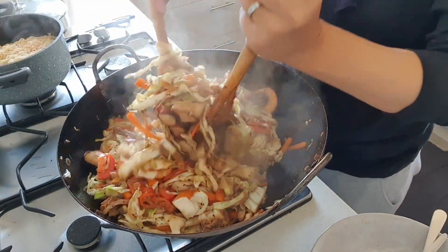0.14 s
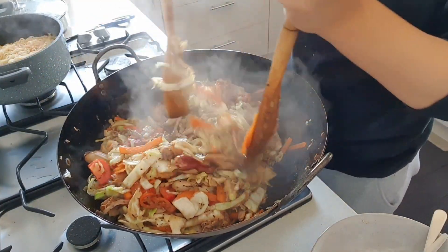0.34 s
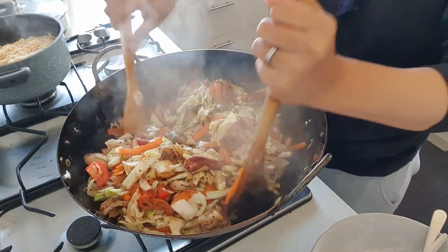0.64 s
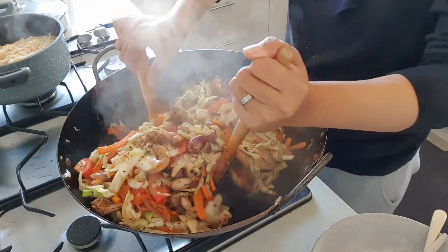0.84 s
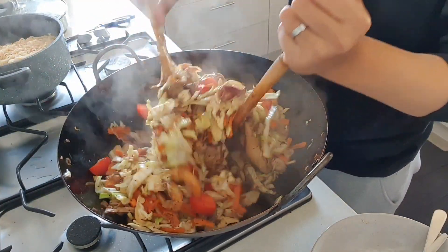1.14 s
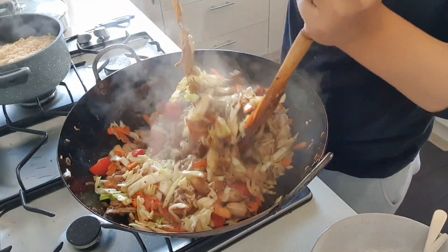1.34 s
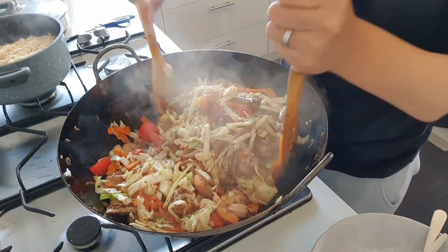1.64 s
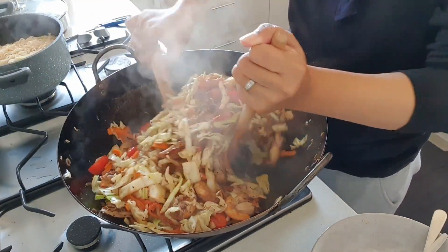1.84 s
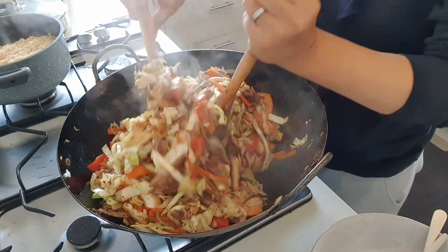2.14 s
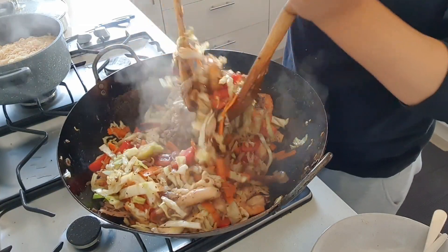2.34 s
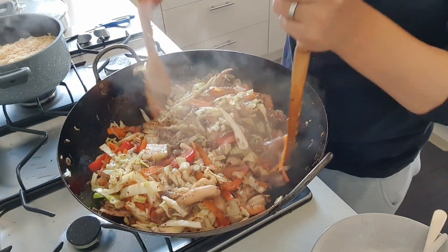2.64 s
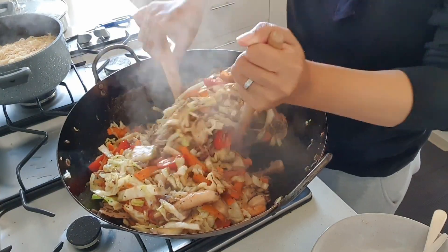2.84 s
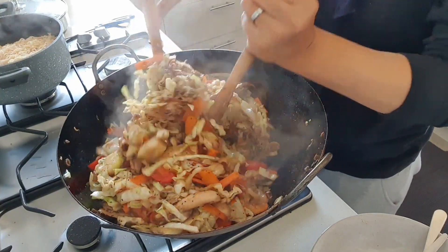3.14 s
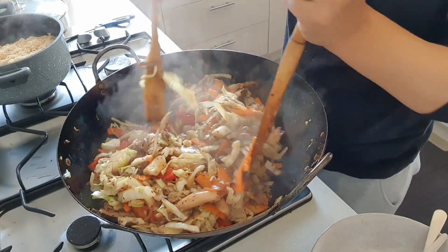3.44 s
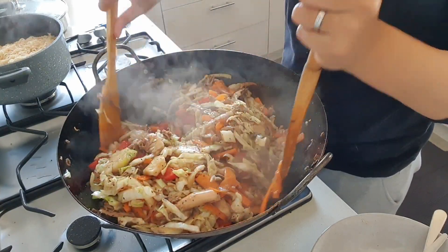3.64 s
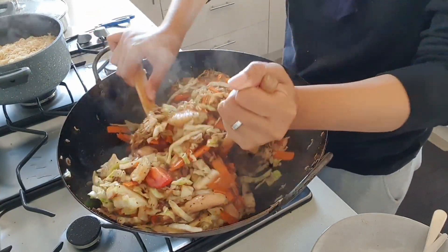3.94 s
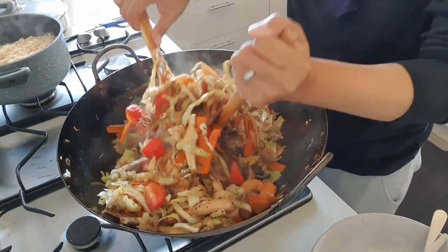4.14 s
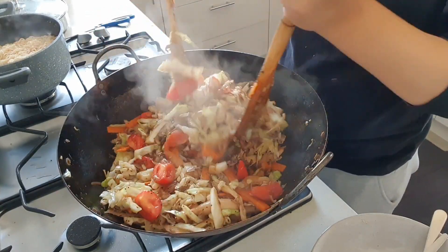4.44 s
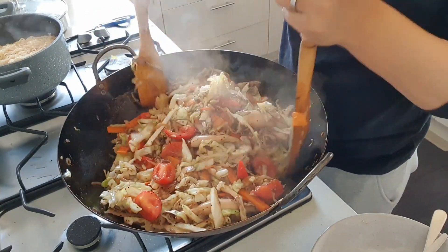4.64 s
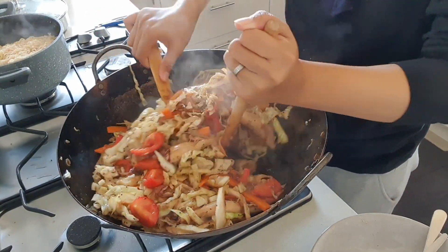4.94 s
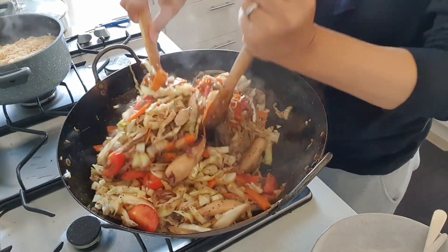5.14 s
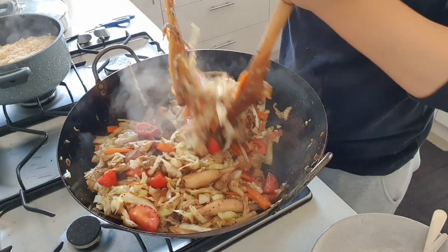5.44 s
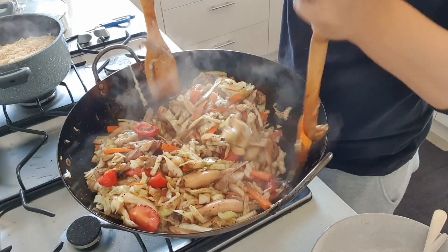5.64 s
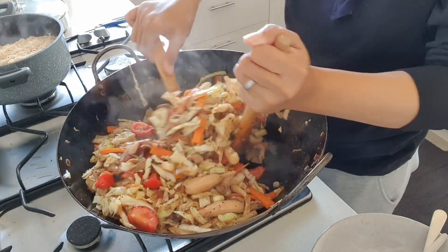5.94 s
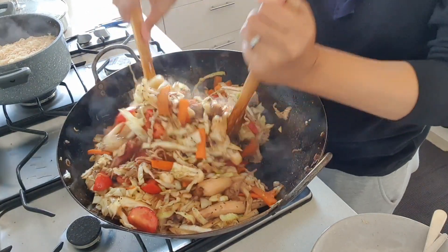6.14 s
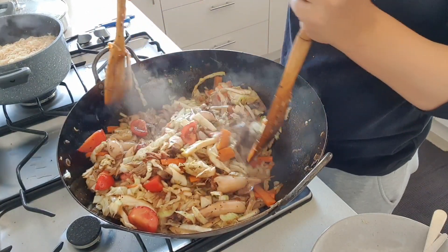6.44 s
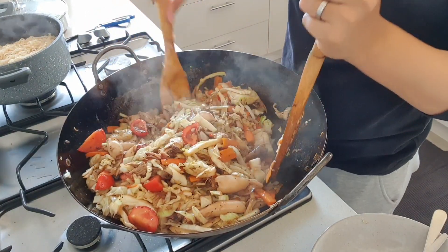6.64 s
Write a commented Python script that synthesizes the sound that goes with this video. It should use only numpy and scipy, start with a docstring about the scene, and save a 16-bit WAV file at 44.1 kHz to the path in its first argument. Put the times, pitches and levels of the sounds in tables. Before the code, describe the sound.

A phone close to the stove in a small, hard kitchen picks up a steady low fan hum with soft airy rush and hob rumble. From 0 s wet vegetable shreds rustle, swish and drop with tiny ticks over faint fine sizzle; light taps come at about 0.6, 0.7 and 1.2 s. At 1.67 s a sharp wooden clack on steel starts a quick run of smaller knocks until 2 s. At 2.4 s the wok skids on its iron support: a loud, gritty, clattering metallic scrape with a low thump, trailing into weaker scrapes until about 3.1 s. The food quietens around 3.5 s, with soft taps near 3.9 and 4.1 s. A hard dry clack lands at 4.68 s with rapid followers, the hardest at 5.7 s, then scattered light knocks and a moderate one at 6.55 s. Soft swishes and hum finish by 6.8 s.

```python
"""A soft wet rush and rustle of vegetables over a humming extractor fan, then wooden spatulas knock on a steel wok.
Knocks are noise pulses ringing short bowl modes; skids are grainy stick-slip noise, bare and through
the modes of the iron support. Food is swept noise, tiny ticks, rustle and sizzle; behind it lie fan tones,
rushing air and the rumble of the gas hob. A phone hears it close by, through two ports, in a small hard kitchen."""
import sys
import numpy as np
from scipy import signal
from scipy.fft import rfft, irfft
from scipy.io import wavfile
from scipy.ndimage import uniform_filter1d

SR = 44100
rng = np.random.default_rng(int(sys.argv[2]) if len(sys.argv) > 2 else 0)


def unload_audio(sound):
    """Save the sound as a 16-bit wav file, at the path given as the first command line argument."""
    columns = np.transpose(np.atleast_2d(sound))
    # keep every value between -1 and 1, then stretch to whole-number steps
    steps = np.round(np.clip(columns, -1, 1) * 32767)
    wavfile.write(sys.argv[1], SR, steps.astype(np.int16))


N = 299880
T = np.arange(N) / SR


def undb(db):
    """Decibels to gain."""
    return 10 ** (np.asarray(db) / 20)


def unit(x):
    """Scale to rms 1."""
    return x / np.sqrt(np.mean(x ** 2))


def fade(t, t60_s):
    """Exponential decay that loses 60 dB in t60_s."""
    return 1000. ** (-t / t60_s)


def colour(x, points):
    """Shape a spectrum by (Hz, dB) points, cut by 60 dB outside them; rms 1."""
    hz, db = np.transpose(points)
    log_f = np.log(np.fft.rfftfreq(x.shape[-1], 1 / SR) + 1)
    gain = undb(np.interp(log_f, np.log(hz), db, -60, -60))
    return unit(irfft(rfft(x) * gain, x.shape[-1]))


def band(x, lo_hz, hi_hz):
    """Fourth-order band-pass."""
    return signal.sosfilt(signal.butter(2, [lo_hz, hi_hz], "band", fs=SR, output="sos"), x)


def ring(x, hz, t60_s):
    """One decaying mode; a unit impulse rings with amplitude about 1."""
    r, w = fade(1 / SR, t60_s), 2 * np.pi * hz / SR
    return signal.lfilter([0, np.sin(w)], [1, -2 * r * np.cos(w), r * r], x)


def walk(rate_hz):
    """Random levels held 1 / rate_hz and slewed; spread near 1."""
    k = int(SR / rate_hz)
    steps = np.repeat(rng.standard_normal(N // k + 1), k)
    return 1.41 * uniform_filter1d(uniform_filter1d(steps, k), k)[:N]


def grains(rate_hz, spread_db, tail_s):
    """Envelope of dense random contacts, a few much stronger, each with a short tail; rms 1."""
    when, size = rng.random((2, N))
    hits = (when < rate_hz / SR) * undb(-spread_db * np.log(size + 0.0045))
    return unit(signal.lfilter([1], [1, -np.exp(-1 / (tail_s * SR))], hits))


def curve(table):
    """Columns of a table joined by straight lines in time."""
    s, *columns = np.transpose(table)
    return [np.interp(T, s, c) for c in columns]


ALIKE_HZ = 650  # around here the two ports pass from similar to unrelated sound


def ports(n):
    """Diffuse noise at the two ports: nearly the same in the bass, unrelated in the treble."""
    mid, side = rfft(rng.standard_normal((2, n)))
    f = np.fft.rfftfreq(n, 1 / SR) + 1
    apart = np.maximum(.1, 1 / np.sqrt(1 + (ALIKE_HZ / f) ** 4))
    return irfft(np.array([mid + apart * side, mid - apart * side]) / np.sqrt(1 + apart ** 2), n)


PORT_LAG_S = .0005  # most by which one port hears a contact before the other


def rough(n, apart=0.87):
    """Contact noise from one spot: it meets the ports at different times, partly scattered on the way."""
    x, other = rng.standard_normal((2, n))
    lag = int(PORT_LAG_S * SR * rng.uniform(-1, 1))
    return np.array([x, (np.roll(x, lag) + apart * other) / np.sqrt(1 + apart ** 2)])


def rubs(table, chatter, rise_s):
    """For each row its start sample and a burst of grainy noise that rises, holds and fades in its own colour."""
    t = T[:3 * SR // 4]
    f = np.fft.rfftfreq(len(t), 1 / SR) + 1
    for s, db, hz, octaves, hold_s, t60_s in table:
        i = int(s * SR)
        tint = 1 / (1 + (np.log2(f / hz) / octaves) ** 2) ** 1.095
        grainy = rough(len(t)) * np.roll(chatter, -i)[:len(t)]
        rub = unit(irfft(rfft(grainy) * tint, len(t)))
        shape = np.minimum(t / rise_s, 1) * fade(np.maximum(t - hold_s, 0), t60_s)
        yield i, undb(db) * rub * shape


# Spatula blows on the bowl. Each row: start in seconds, level in dB of the blow (the clack and most layers
# follow it, the broad crack stays equally loud), pitch of the clack in Hz, low bowl ring in dB relative
# to the blow before the layer trims.
BLOWS = [(0.55, -49.5, 776, 12), (0.741, -39.5, 2710, -10.5), (1.215, -38, 2020, -30), (1.62, -43, 760, 5),
         (1.668, -22, 1510, -31), (1.67, -17.5, 4120, -26), (1.75, -35, 1620, -10), (1.79, -28, 3110, -25),
         (1.821, -27, 1380, -23), (1.883, -26.5, 975, -44), (1.994, -31, 1360, -39),
         (3.881, -34.5, 1120, -33), (4.134, -39, 1310, -35), (4.662, -38.5, 3920, -14),
         (4.677, -15.5, 4140, -19.5), (4.715, -21.5, 2190, -13.5), (4.874, -33.5, 1930, -20),
         (4.921, -44, 1380, -20), (5.184, -41, 2390, -32), (5.235, -40, 1380, -27), (5.45, -40, 5000, -30),
         (5.524, -36, 3660, -30), (5.536, -36, 2720, -37), (5.651, -32.5, 3250, -37),
         (5.695, -13.5, 4140, -28.5), (5.743, -26.5, 2390, -16.5), (5.801, -36, 1370, -10),
         (6.047, -35.5, 1690, -36), (6.088, -42, 4020, -25), (6.219, -34.5, 1140, -35),
         (6.33, -41.5, 2140, -26), (6.554, -26.5, 4280, -11)]
# Modes of the loaded bowl, the first two its low note. Each row: pitch in Hz, relative level in dB
# before random scatter, decay t60 in seconds.
BOWL_MODES = [(530, 0, .22), (730, -5, .12), (1420, -8, .04), (2100, -6, .04), (2370, -6, .05),
              (3820, -6, .04), (4300, -8, .06), (4600, -8, .05)]
SOFT_DB = -35  # a gentle knock
CRACK_DB, CRACK_SINKS = -19, 1  # broad crack under a gentle knock; dB it falls behind per dB of harder blow
WOOD_DB, WOOD_SINKS = -7, 0.1  # woody body, likewise


def knocks():
    """Wood lands on steel and rebounds once, more on hard blows; food damps the bowl to a dry clack and short modes."""
    out, t = np.zeros((2, N + SR)), T[:SR // 2]
    lead = T[:SR // 50]
    push = (t / .0007) * np.exp(-t / 0.00059)
    second_push = np.roll(push, int(0.00513 * SR))
    for s, db, hz, low_db in BLOWS:
        harder_db = db - SOFT_DB
        crack_db = CRACK_DB - CRACK_SINKS * harder_db
        wood_db = WOOD_DB - WOOD_SINKS * harder_db
        rebound = min(undb(0.71 * (db + 11)), 1)
        contact = rough(len(t)) * (push + rebound * second_push)

        clack = ring(contact, hz, 0.018)
        tail = band(rough(len(t)), hz / 0.89, hz * 1.57) * t / (t + .002) * fade(t, 0.12)
        thud = band(rough(len(t)), 310, 1090) * t / (t + 0.0033) * fade(t, 0.25)
        wood_fade = fade(t, 0.013) + 0.39 * fade(t, 0.082)
        wood = band(rough(len(t)), 1100, 2440) * t / (t + 0.00052) * wood_fade
        crack = band(contact, 1000, 10000)

        # each blow wakes the modes differently
        scatter_db = 0.83 * rng.standard_normal(len(BOWL_MODES))
        modes = [undb(g + e) * ring(contact, f, t60_s)
                 for (f, g, t60_s), e in zip(BOWL_MODES, scatter_db)]
        low_note = sum(modes[:2])
        # upper modes are stronger the closer they lie to the clack: 6 dB lost per octave away
        near_modes = sum(undb(-6 * abs(np.log2(m[0] / hz))) * x
                         for m, x in zip(BOWL_MODES[2:], modes[2:]))

        # each layer is set by its peak, in dB relative to the blow
        layers = [(clack, -1.5), (tail, -15), (near_modes, -11), (low_note, low_db + 3.5),
                  (thud, low_db - 0.5), (wood, wood_db), (crack, crack_db)]
        i = int(s * SR)
        out[:, i:i + len(t)] += sum(undb(db + g) * x / np.abs(x).max() for x, g in layers)
        # the blade grazes the steel just before it lands
        graze = unit(band(rough(len(lead)), hz / 1.15, hz * 1.67)) * np.exp(-lead[::-1] / 0.0034)
        out[:, i - len(lead):i] += undb(db - 11.5) * graze
    return out[:, :N]


# Steel slipping on iron; the two low rows (2.43 s and 3.04 s) are the hob groaning. Each row: start in seconds,
# # level in dB rms before its envelope and the mix trims, centre of its colour in Hz, spread in octaves, fade
# t60 in seconds.
SLIPS = [(1.277, -42.5, 2090, 0.19, 0.42), (2.264, -38.5, 2150, 0.24, 0.21),
         (2.388, -17, 6200, 1.3, 0.36), (2.395, -32.5, 1120, 0.36, 0.35),
         (2.402, -16, 5160, 0.58, 0.11), (2.409, -20, 2020, 0.52, 0.11), (2.43, -35, 430, 0.51, 1),
         (2.472, -19.5, 3260, 0.66, 0.11), (2.497, -29, 2070, 0.57, 0.38),
         (2.51, -33, 5560, 0.31, 0.28), (2.58, -37, 4900, 1.1, 0.57),
         (2.644, -31, 3260, 1.77, 0.14), (2.691, -44.5, 1900, 1.2, 0.66),
         (2.886, -28, 4170, 1.08, 0.19), (2.9, -37, 1060, 0.13, 0.38),
         (3.016, -38.5, 3730, 1.5, 0.27), (3.04, -42, 350, 0.29, 0.43),
         (3.057, -42.5, 2740, 1.35, 0.17), (4.825, -46, 1130, 0.28, 0.12),
         (6.667, -50, 2020, 0.12, 0.19)]
# Modes of the cast-iron support. Each row: pitch in Hz before detuning, relative level in dB before scatter,
# decay t60 in seconds before the wok's damping.
SUPPORT_MODES = [(290, -8, .25), (360, -8, .25), (447, -9, .2), (610, -12, .15), (759, -14, .2),
                 (1034, 0, .2), (1290, -7, .1), (1955, 0, .12), (2090, -4, .12), (2213, -4, .1),
                 (2854, -3, .15), (3160, -7, .1), (3367, 0, .12), (3505, -6, .15), (3800, -6, .08),
                 (4047, -1, .12), (4705, 2, .07), (5066, -5, .08), (5225, -5, .08), (5465, -3, .08),
                 (5778, -9, .15), (6750, -7, .12), (7374, -6, .1), (7495, -6, .1)]
SLIP_HOLD_S = 0.017
DAMPING = 1.7  # the loaded wok shortens the ring of its support by this factor


def skids():
    """Stick-slip chatter, heard bare and through the modes of the support; each slip wakes them differently."""
    out = np.zeros((2, N + SR))
    slips = [(s, db, hz, octaves, SLIP_HOLD_S, t60_s) for s, db, hz, octaves, t60_s in SLIPS]
    chatter = .5 + grains(1200, 3.2, 0.0015)
    for i, rub in rubs(slips, chatter, rise_s=0.003):
        scatter_db = 2 * rng.standard_normal(len(SUPPORT_MODES))
        detune = .003 * rng.standard_normal(len(SUPPORT_MODES))
        rung = sum(undb(g + e) * ring(rub, hz * (1 + u), t60_s / DAMPING)
                   for (hz, g, t60_s), e, u in zip(SUPPORT_MODES, scatter_db, detune))
        clatter = np.std(rub) * unit(rung)
        out[:, i:i + rub.shape[1]] += undb(-2.0) * clatter + undb(-2.5) * rub
    return out[:, :N]


# Food tipping over or swept along the steel. Each row: start in seconds, level in dB rms before its envelope,
# centre of its colour in Hz, hold in seconds.
FOOD_SWEEPS = [(.04, -39, 7140, 0.008), (0.371, -52, 3300, 0.03), (.505, -49, 2300, 0.066),
               (0.654, -52.5, 3500, 0.076), (0.726, -47, 2150, 0.11), (1.038, -50.5, 2400, 0.055),
               (1.268, -47, 3850, 0.048), (1.364, -46, 3300, 0.011), (1.76, -46.5, 2960, 0.047),
               (3.781, -56, 1880, 0.46), (4.79, -47.5, 3250, 0.039), (5.398, -59, 4520, 0.066),
               (5.501, -50.5, 3480, 0.034), (5.849, -46, 2790, 0.038), (6.324, -53, 6100, 0.0095),
               (6.385, -55, 5500, 0.011), (6.582, -55, 4770, 0.083), (6.665, -52.5, 4050, 0.055)]
SWISH_OCTAVES, SWISH_T60_S = 0.96, 0.18  # spread of the colour; fade


def swishes():
    """Soft wet rushes; food on the steel lets nothing ring."""
    out = np.zeros((2, N + SR))
    sweeps = [(s, db, hz, SWISH_OCTAVES, hold_s, SWISH_T60_S) for s, db, hz, hold_s in FOOD_SWEEPS]
    for i, rub in rubs(sweeps, .9 + grains(400, 3.0, .002), rise_s=.012):
        out[:, i:i + rub.shape[1]] += rub
    return out[:, :N]


# Food being turned, joined by straight lines; also steers the morsels. Each row: time in seconds,
# rustle in dB and fine sizzle in dB, both before their trims.
TURNING = [(0.0, -53, -63.5), (0.39, -56.5, -65.5), (0.8, -58.5, -65.5), (1.87, -57.5, -67),
           (2.25, -59.5, -61.5), (3.15, -55, -65), (3.55, -74, -71), (4.02, -67, -66), (4.5, -66.5, -65),
           (4.77, -58, -62), (5.02, -64.5, -68.5), (5.59, -66, -64.5), (5.75, -55.5, -68), (6.2, -63, -71),
           (6.8, -72, -73)]
# Colour of the rustle. Each row: frequency in Hz, relative level in dB.
RUSTLE_COLOUR = [(500, -2.5), (900, -1.5), (2000, 4), (3500, -3.5), (6000, -9.5), (8500, -26),
                 (11000, -16.5)]
# Colour of the sizzle. Each row: frequency in Hz, relative level in dB.
SIZZLE_COLOUR = [(3000, 1.5), (6000, 2.5), (8000, 4), (9200, -8.5), (12000, 3), (16000, -3.5)]


def food():
    """Wet shreds slide and tumble (rustle); juice spits on hot steel (sizzle)."""
    rustle_db, sizzle_db = curve(TURNING)
    rustle = colour(ports(N) * (1.6 + grains(350, 1.0, 0.0097)), RUSTLE_COLOUR)
    sizzle = colour(ports(N) * (1.6 + grains(150, 7.3, 0.0035)), SIZZLE_COLOUR)
    return undb(rustle_db + 1.0) * rustle + undb(sizzle_db + 5.0) * sizzle


def morsels(rate_hz=30, over_db=9, spread_db=2.5):
    """Bits of food dropping back: tiny ticks at random times and pitches, louder while the rustle is."""
    out, t = np.zeros((2, N + SR)), T[:SR // 50]
    rustle_db = curve(TURNING)[0]
    for when, pitch, size, pan in rng.random((int(rate_hz * N / SR), 4)):
        hz, i = 900 * 6. ** pitch, int(when * N)
        db = rustle_db[i] + over_db - spread_db * np.log(size + .03)
        # the tick dies within a few cycles
        tick = np.sin(2 * np.pi * hz * t) * np.exp(-t * hz / 5.4) * np.minimum(t / 0.0011, 1)
        sides = np.array([[1 + .6 * (pan - .5)], [1 - 1.4 * (pan - .5)]])
        out[:, i:i + len(t)] += undb(db) * tick * sides
    return out[:, :N]


# Hum of the fan motor. Each row: pitch in Hz before wavering, level in dB before its trim and wavering.
MOTOR_TONES = [(148, -62), (195.7, -63.5), (244.8, -65.5), (293.6, -59), (311, -52.5), (342.4, -63),
               (538, -73.5)]
# Colour of the air rush. Each row: frequency in Hz, relative level in dB.
AIR_COLOUR = [(110, -47), (190, -15.5), (246, -10), (314, -4), (392, -13.5), (537, -14.5), (709, -18.5),
              (1030, -17.5), (3600, -35.5), (7600, -36.5), (8900, -39.5), (13000, -35), (16000, -39.5)]
AIR_DB = -53  # about which the rush swells


def fan():
    """Motor tones that waver a little, over a rush of air that swells only slightly."""
    tones = 0
    for hz, db in MOTOR_TONES:
        gain = undb(db + 2.5 + 1.6 * walk(6))
        phase = 2 * np.pi * np.cumsum(hz + 0.782 * walk(4)) / SR
        tones = tones + gain * np.sin(phase)
    swell_db = .8 * walk(3)
    return tones + undb(AIR_DB + swell_db) * colour(ports(N), AIR_COLOUR)


# Level of the stove's rumble, joined by straight lines. Each row: time in seconds, level in dB before its trim.
HOB_LEVEL = [(0.0, -57), (0.32, -61.5), (0.54, -56), (1.4, -55.5), (2.36, -58.5), (2.42, -41.5),
             (3.3, -63.5), (4.01, -56), (4.5, -62), (4.67, -54.5), (5.22, -51), (5.3, -60), (6.0, -53.5),
             (6.1, -60), (6.8, -58)]
# Colour of the rumble. Each row: frequency in Hz, relative level in dB.
HOB_COLOUR = [(12, -36.5), (20, -12), (43, 1), (146, 2), (173, -3.5), (199, -15.5), (220, -26.5),
              (290, -22.5), (480, -120)]


def hob():
    """Low rumble of the stove body: bass noise that follows the level curve."""
    return undb(curve(HOB_LEVEL)[0] + 2.5) * colour(ports(N), HOB_COLOUR)


ROOM_T60_S, ROOM_DB = 0.3, -15.5


def kitchen(near):
    """Echo off tiles and cupboards: decaying band-limited noise as the room's response."""
    t = T[:SR // 2]
    echo = band(rng.standard_normal((2, len(t))), 300, 7000) * fade(t, ROOM_T60_S) * (t > .003)
    echo = echo / np.sqrt(np.sum(echo ** 2) / 2)
    return undb(ROOM_DB) * signal.fftconvolve(near, echo, axes=1)[:, :N]


def scene():
    """Knocks, skids, swishes and morsels echo in the kitchen; rustle, sizzle, fan and hob are added without echo."""
    near = knocks() + skids() + swishes() + morsels()
    return near + kitchen(near) + food() + fan() + hob()


TOP_HZ = 15800


def record(dry):
    """The phone rounds the loudest peaks and cuts the top."""
    return signal.sosfilt(signal.ellip(10, .2, 70, TOP_HZ, fs=SR, output="sos"), np.tanh(dry))


dry = scene()
out = record(dry)
unload_audio(out)
```